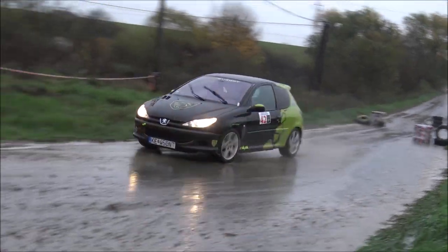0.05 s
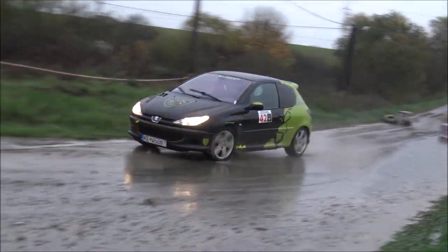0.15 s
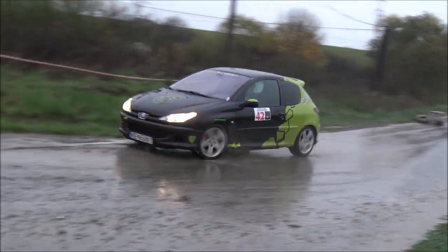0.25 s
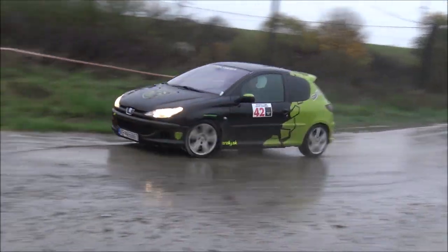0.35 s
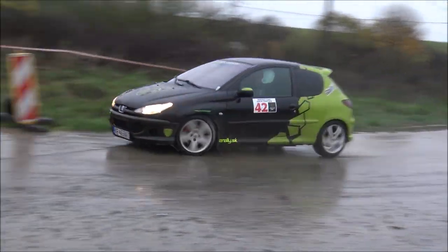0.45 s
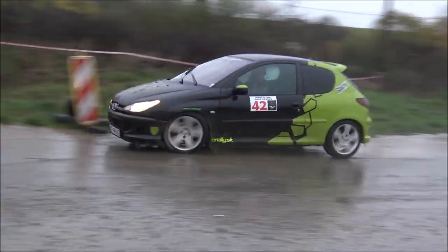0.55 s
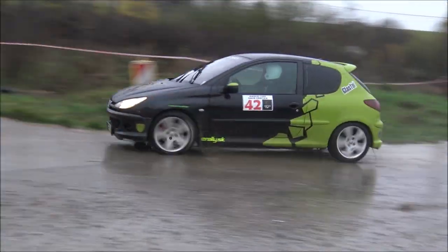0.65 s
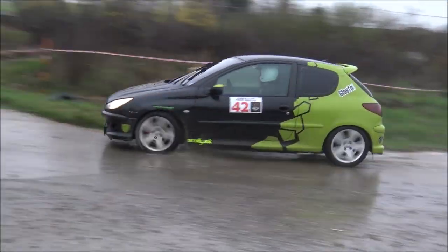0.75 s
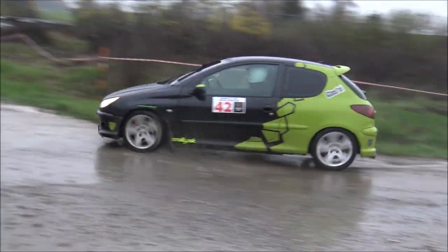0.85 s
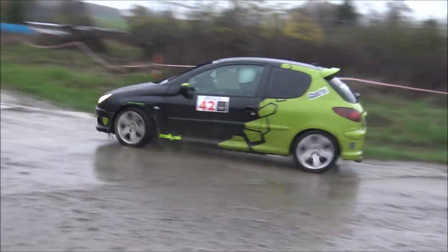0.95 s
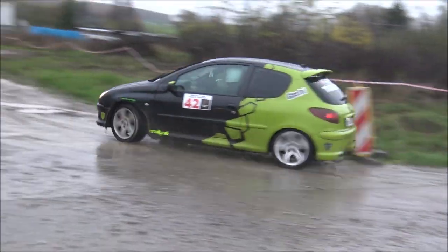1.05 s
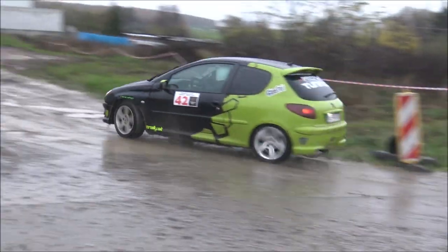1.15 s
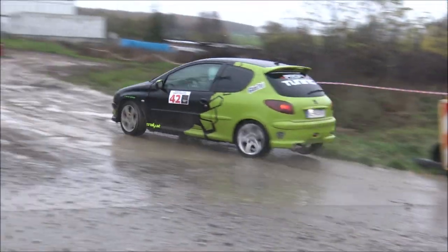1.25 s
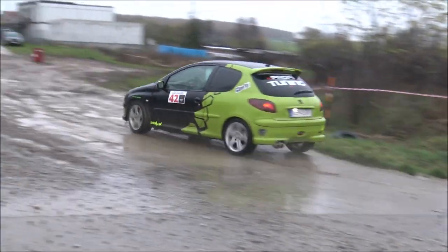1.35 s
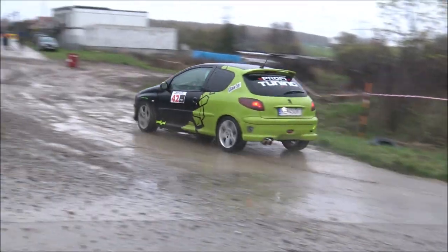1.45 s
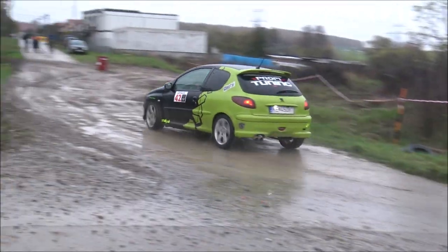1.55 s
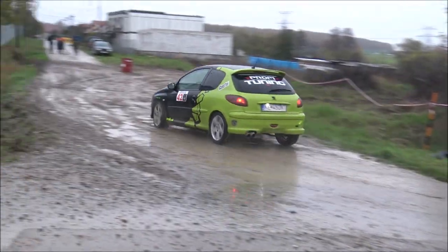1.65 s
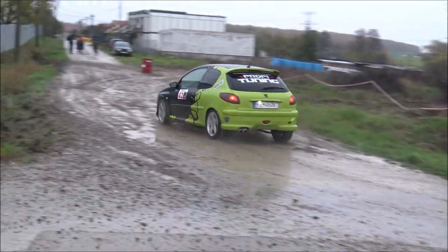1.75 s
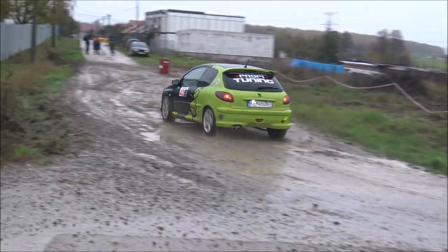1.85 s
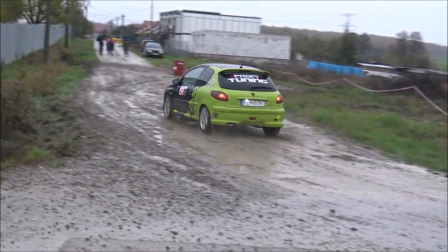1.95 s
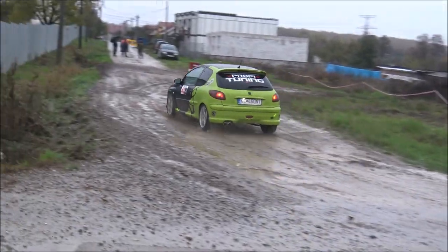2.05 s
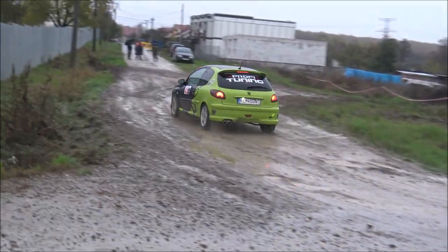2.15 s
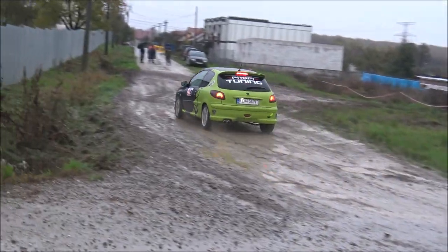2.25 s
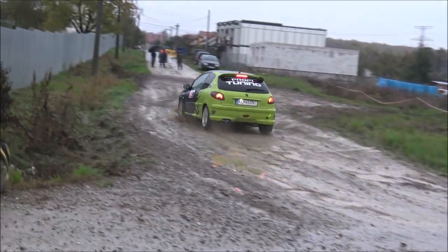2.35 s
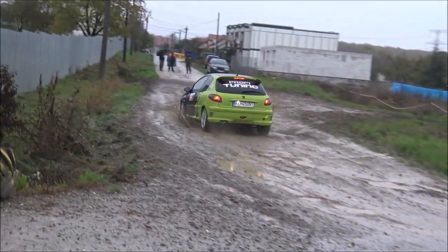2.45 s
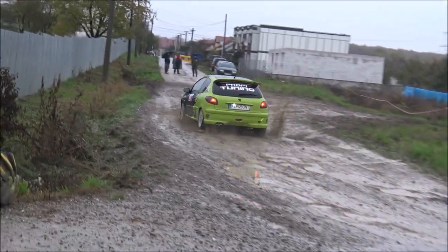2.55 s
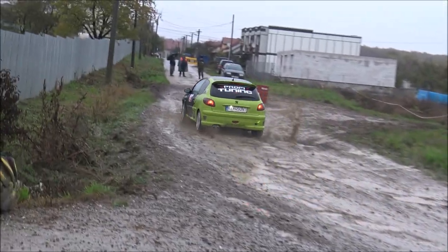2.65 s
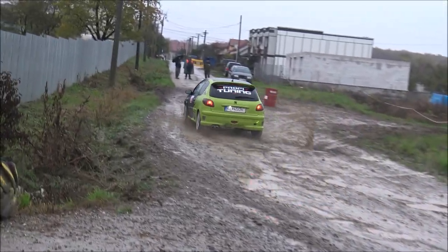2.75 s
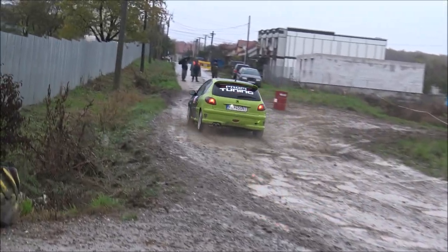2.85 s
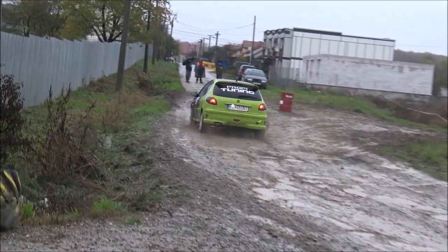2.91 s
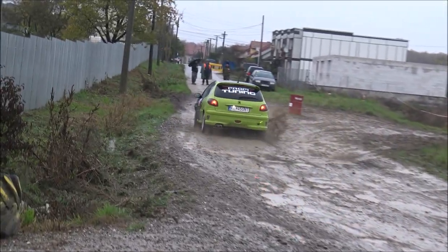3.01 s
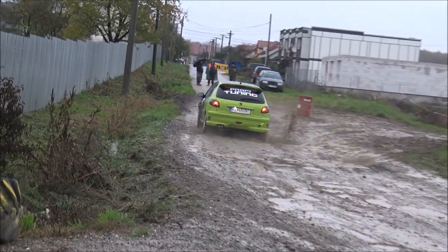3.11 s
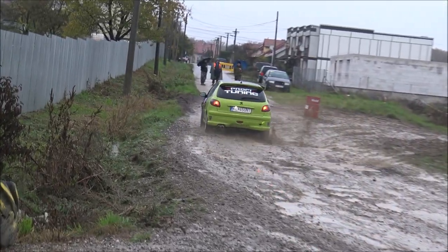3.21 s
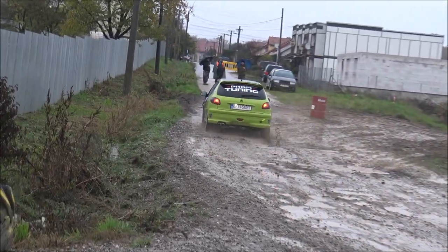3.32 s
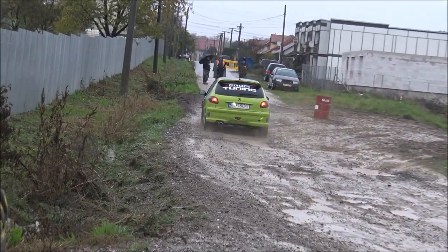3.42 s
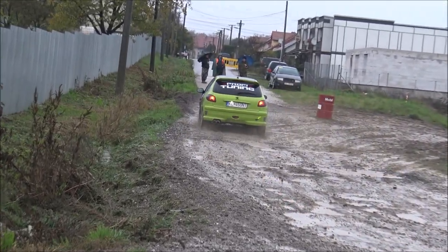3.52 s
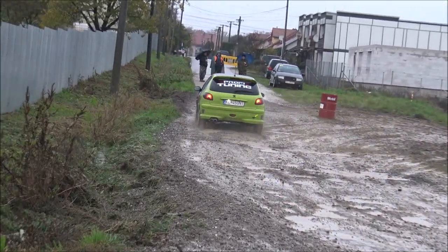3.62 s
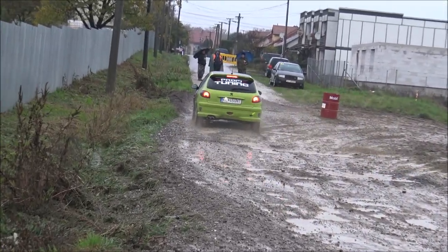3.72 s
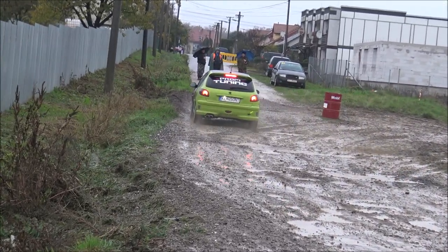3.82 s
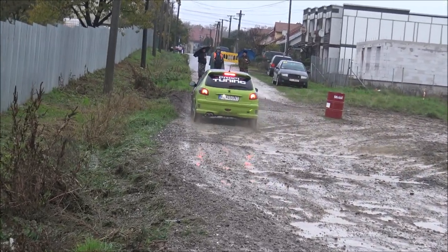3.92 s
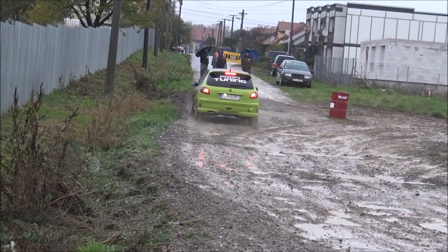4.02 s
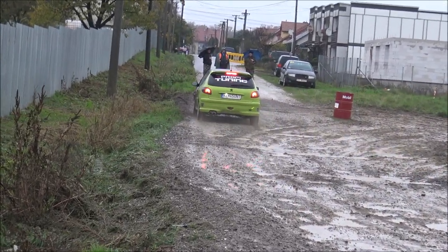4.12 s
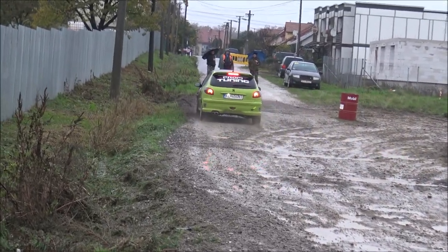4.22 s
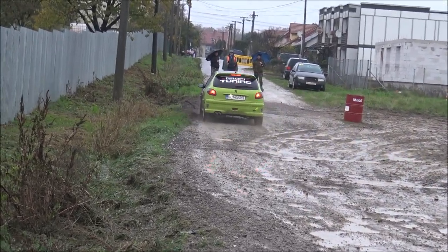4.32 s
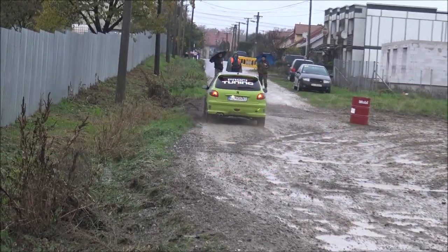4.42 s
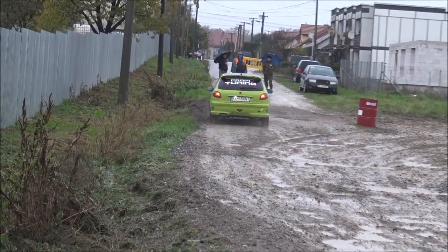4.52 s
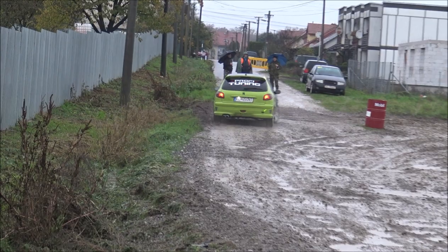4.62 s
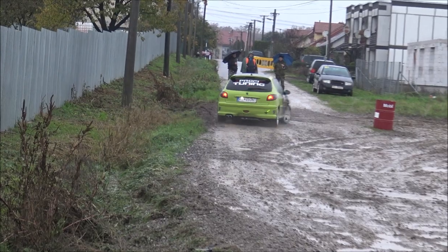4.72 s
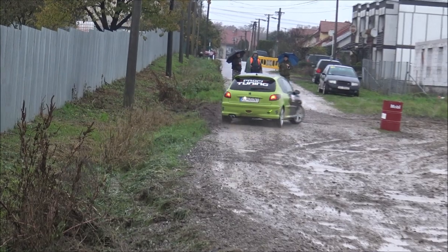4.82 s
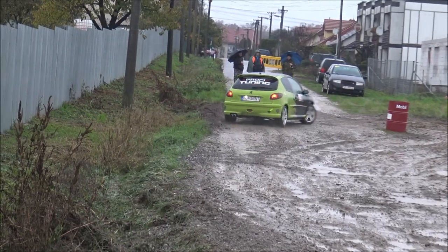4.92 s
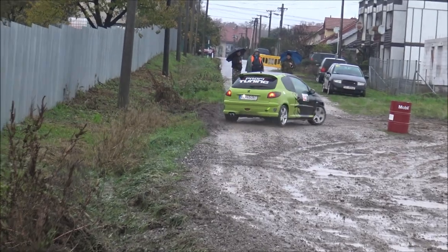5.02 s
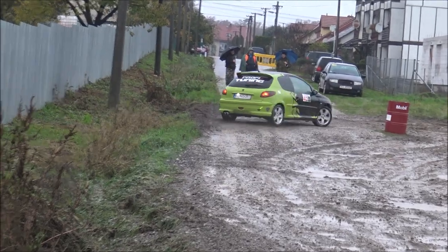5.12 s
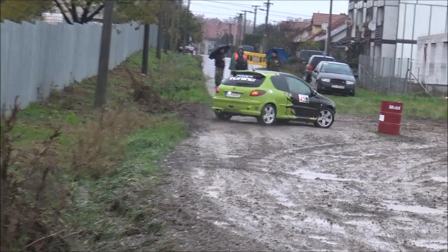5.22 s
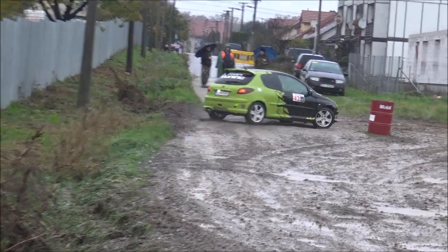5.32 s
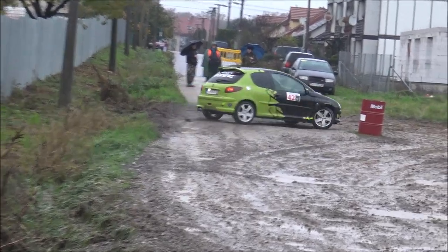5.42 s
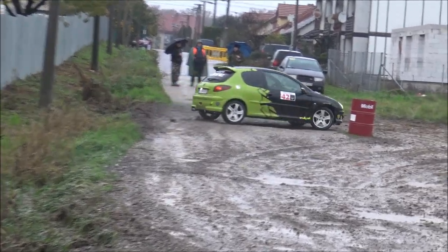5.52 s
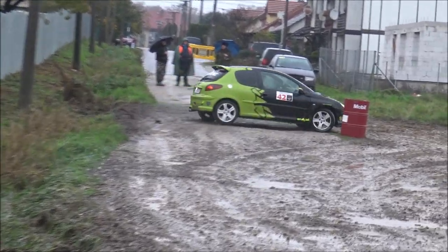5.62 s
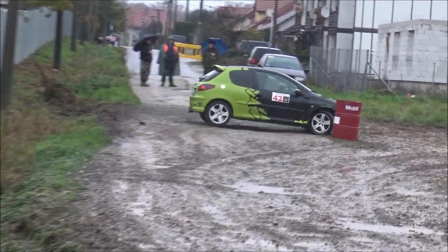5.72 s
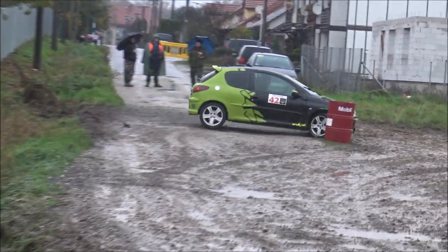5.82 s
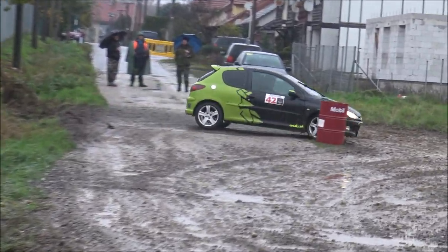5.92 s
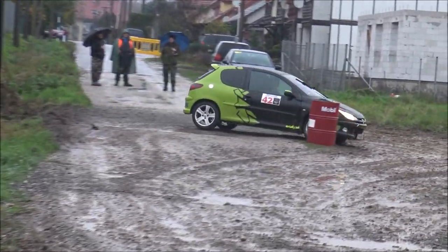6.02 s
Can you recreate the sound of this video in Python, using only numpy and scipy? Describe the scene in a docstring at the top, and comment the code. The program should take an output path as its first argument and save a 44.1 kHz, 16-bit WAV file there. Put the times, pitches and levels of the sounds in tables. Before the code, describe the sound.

On a wet, muddy outdoor course, a rally car's engine drones and howls past the trackside microphone over hissing spray. The exhaust loses its rasp with distance, eases briefly and surges again. Then the engine drops to a low, uneven burble and the tyres take over, scraping and crunching through a long gravel skid with a few stone knocks and a rumble over ruts. The sound stays near the centre.

```python
"""A small four-cylinder rally car passes about 4 m from the microphone at high revs on a wet, muddy course.
Its firings boom and rasp in the exhaust while the tyres throw spray. The driver lifts and brakes, the revs
sink, and the car slides round a turn some 18 m off, scrubbing through gravel and flinging stones.
It stays near the centre of the stereo image; fence and buildings return a faint echo of the exhaust."""
import sys
import numpy as np
from scipy import signal
from scipy.fft import rfft, irfft
from scipy.io import wavfile
from scipy.ndimage import uniform_filter1d, map_coordinates

SR = 44100
rng = np.random.default_rng(int(sys.argv[2]) if len(sys.argv) > 2 else 0)


def transcribe(u):
    """Save the signal u as a 16-bit wav file named by the first command-line argument.

    u: samples, shape (n,) or (channels, n), limited to [-1, 1]; the rate is SR.
    q: integer samples, one column per channel.
    """
    v = np.clip(np.atleast_2d(u).T, -1, 1)
    q = np.round(v * 32767).astype(np.int16)
    wavfile.write(sys.argv[1], SR, q)


N = 267238
TIME_S = np.arange(N) / SR


def undb(db):
    """Decibels to gain."""
    return 10 ** (np.asarray(db) / 20)


def curves(table):
    """Each column after the time column as a value per sample."""
    times, *columns = np.transpose(table)
    return [np.interp(TIME_S, times, column) for column in columns]


def colour(x, points):
    """Filter by a spectrum of (freq_hz, level_db) points, falling 20 dB an octave beyond its ends."""
    hz, db = np.transpose(points)
    bins_hz = np.maximum(np.arange(N + 1) * SR / (2 * N), 1)
    octaves_outside = np.abs(np.log2(bins_hz / np.clip(bins_hz, hz[0], hz[-1])))
    gain_db = np.interp(np.log(bins_hz), np.log(hz), db) - 20 * octaves_outside
    return irfft(rfft(x, 2 * N) * undb(gain_db))[:N]


def butter(x, hz, kind):
    """Fourth-order Butterworth filter."""
    return signal.sosfilt(signal.butter(4, hz, kind, fs=SR, output="sos"), x)


def unit(x, band_hz=None):
    """Scale to rms 1, overall or within a band."""
    return x / np.std(x if band_hz is None else butter(x, band_hz, "bandpass"))


def ring(x, modes):
    """Parallel resonances of (pitch_hz, width_hz, level_db), alternating in polarity."""
    return sum((-1) ** k * undb(db) * signal.lfilter(*signal.iirpeak(hz, hz / width, fs=SR), x)
               for k, (hz, width, db) in enumerate(modes))


def walk(rate_hz):
    """Smooth random wander with a spread near 1."""
    return map_coordinates(rng.standard_normal(4096), [TIME_S * rate_hz], order=2, mode="wrap")


def swell(start_s, length_s, attack_s, release_s, sag_db_per_s=0):
    """Gain that rises, holds or sags, and dies away."""
    age = np.maximum(TIME_S - start_s, 0)
    release = np.exp(-np.maximum(age - length_s, 0) / release_s)
    return np.minimum(age / attack_s, 1) * release * undb(-sag_db_per_s * age)


def blend(tones, gains):
    """Weighted sum of engine orders whose power holds steady as the weights shift."""
    return sum(gains[k] * tones[k] for k in tones) / np.sqrt(sum(g ** 2 for g in gains.values()))


# rolling rumble spectrum: freq_hz, density_db
RUMBLE_SPECTRUM = [(20, -23), (50, -19), (85, -4.5), (130, -3.5), (250, -1.5), (420, -5), (780, -5.5),
                   (1200, -15)]
# rumble along the rutted course: time_s, level_db
RUTS = [(0, -33), (2, -32), (3.2, -37.5), (5.1, -36), (5.6, -26), (6.06, -27)]


def rumble():
    """The wheels rumble over ruts."""
    rut_db, = curves(RUTS)
    return unit(colour(rng.standard_normal(N), RUMBLE_SPECTRUM)) * undb(rut_db + 2 * walk(3.882))


# brief hollow tones, mostly in the turn: centre_s, pitch_hz, width_hz, half_length_s, level_db
FLARES = [(0.643, 402, 17, 0.069, -22), (4.314, 180.6, 12, 0.055, -25.5), (4.672, 165, 10, 0.061, -26.5),
          (4.946, 276.5, 10.3, 0.049, -24.5), (5.032, 172.3, 5.55, 0.14, -22.5),
          (5.373, 282, 7.9, 0.058, -24), (5.984, 209.4, 13, 0.031, -20), (6.006, 507, 110, 0.086, -26.5),
          (5.965, 950, 69, 0.069, -24)]


def flares():
    """Narrow, wavering tones that swell and die away quickly."""
    out = np.zeros(N)
    for centre, hz, width, half_length, db in FLARES:
        phase = 2 * np.pi * np.cumsum(hz + width / 2 * walk(2 * width)) / SR
        out += np.sqrt(2) * np.sin(phase) * undb(db) * np.exp(-((TIME_S - centre) / half_length) ** 2)
    return out


def strikes(table, modes, crumble_s, crumble):
    """Each blow is a sharp contact and a brief crumble that ring the given modes."""
    t = np.arange(2048) / SR
    out = np.zeros(N + len(t))
    for start, db in table:
        push = crumble * rng.standard_normal(len(t)) * np.exp(-t / crumble_s) - (t == 0)
        hit = ring(push, modes)
        out[int(start * SR):][:len(t)] += undb(db) * hit / np.abs(hit).max()
    return out[:N]


# stones hitting the underbody in the turn: start_s, relative_peak_db
KNOCKS = [(4.1193, -19), (4.3642, -14), (4.3879, -15), (4.6, -14.5), (4.6763, -8.5), (4.8351, -14)]
# underbody modes: pitch_hz, width_hz, level_db
PANEL_MODES = [(950, 83, -1), (1382.4, 172, 3), (1750, 290, -4.5), (2099, 170, -3)]
# flung pebbles landing on the course: start_s, relative_peak_db
PEBBLES = [(4.239, -28), (4.4226, -26), (4.7156, -20), (4.7902, -13), (5.4255, -23), (5.7486, -15),
           (5.9, -21), (5.9878, -23), (6.0201, -29)]


def stones():
    """Large stones knock on the floor pan; pebbles click as they land."""
    knocks = strikes(KNOCKS, PANEL_MODES, crumble_s=0.0048, crumble=0.082)
    pebbles = strikes(PEBBLES, [(6600, 1700, 8), (11000, 2800, -10)], crumble_s=0.0018, crumble=0.79)
    return undb(0.5) * knocks + undb(-2.5) * pebbles


# standing water near the microphone: start_s, length_s, splash_db, scrub_db
PUDDLES = [(-.05, 0.14, -39, -34.5), (-.05, .25, -36, -41), (.2, 0.374, -38, -40.5),
           (0.556, 0.32, -37, -37.5), (0.933, 0.53, -45.5, -44.5), (1.422, .27, -40, -39.5)]
# the tyres lose grip in the turn: start_s, length_s, scrub_db, grit_db
SKIDS = [(4.309, .08, -21, -50), (4.66, 1.167, -21.5, -29.2), (5.855, 0.1655, -25.5, -32)]


def tyre_contact():
    """Gains of scrub, grit and spray; rolling, puddles and slides add in power."""
    # wet tarmac gives way to ever coarser gravel
    on_gravel_s = np.clip(TIME_S - 1.85, 0, 2.4)
    scrub = undb(-43 + 4 * on_gravel_s)
    grit = undb(-41 + 1.47 * on_gravel_s)
    spray = undb(-47)
    for start, length, splash_db, scrub_db in PUDDLES:
        splash = swell(start, length, attack_s=0.043, release_s=0.029)
        scrub = np.hypot(scrub, splash * undb(scrub_db))
        grit = np.hypot(grit, splash * undb(splash_db))
        spray = np.hypot(spray, splash * undb(splash_db - 1))
    for start, length, scrub_db, grit_db in SKIDS:
        slide = swell(start, length, attack_s=.16, release_s=0.043, sag_db_per_s=1.3)
        drying_db = 5 * (TIME_S - start)  # a slide throws water at first and soon wipes the ground dry
        scrub = np.hypot(scrub, slide * undb(scrub_db))
        grit = np.hypot(grit, slide * undb(grit_db))
        spray = np.hypot(spray, slide * undb(grit_db - 8.5 - drying_db))
    return scrub, grit, spray


def grains(per_s, spread_db, smooth):
    """Countless tiny impacts of uneven size over a share of smooth rush."""
    size = undb(spread_db * np.minimum(rng.exponential(size=N), 5)) * rng.standard_normal(N)
    return unit(size * (rng.random(N) < per_s / SR)) + smooth * rng.standard_normal(N)


# spectra of scrubbing tread, crunching grit and thrown water: freq_hz, density_db
SCRUB_SPECTRUM = [(60, -16), (120, -6), (200, 1.5), (400, -12), (520, -10), (740, -2.5), (1080, -8),
                  (1300, -2.5), (1560, -3.5), (1850, -7.5), (2120, -6.5), (2600, -16.5), (4000, -31)]
GRIT_SPECTRUM = [(1800, -5.5), (2700, -0.5), (3200, -2.5), (4300, -6), (5500, -10.5), (6500, -11.5),
                 (9000, -28.5)]
SPRAY_SPECTRUM = [(4000, -5.5), (5800, -7.5), (6600, -5.5), (8500, -7), (10500, -12), (13000, -19),
                  (16000, -25)]


def tyres():
    """Tread scrubs through gravel, crunches grit and throws water; all three judder and surge together."""
    scrub_gain, grit_gain, spray_gain = tyre_contact()
    judder_db = .9 * walk(55) + .55 * (walk(20.86) + walk(9.4))
    scrub = unit(colour(grains(3000, spread_db=2.5, smooth=1.0), SCRUB_SPECTRUM), band_hz=(1200, 2600))
    grit = unit(colour(grains(5000, spread_db=3.0, smooth=0.78), GRIT_SPECTRUM))
    spray = unit(colour(grains(3000, spread_db=4, smooth=1.5), SPRAY_SPECTRUM))
    direct = undb(judder_db) * (scrub * scrub_gain + grit * grit_gain + spray * spray_gain)
    # wheel arches and wet ground reflect it along paths that shift as the car moves
    delays_s = [delay * (1 + .15 * walk(1.5)) for delay in (.0019, .0046)]
    return direct + sum(.2 * np.interp(TIME_S - delay, TIME_S, direct) for delay in delays_s)


def firings(turns, imbalance_db, scatter_db, jitter_s):
    """Two exhaust pulses a turn; every second one is weaker, and no two are quite alike."""
    count = np.arange(1, int(2 * turns[-1]))
    size_error, time_error = rng.standard_normal((1200, 2))[:len(count)].T
    size = undb(scatter_db * size_error - count % 2 * imbalance_db)
    position = np.interp(count / 2, turns, np.arange(N)) + SR * jitter_s * time_error
    fraction, whole = np.modf(np.clip(position, 0, N - 2))
    sample = whole.astype(int)
    return np.bincount(sample, size * (1 - fraction), N) + np.bincount(sample + 1, size * fraction, N)


# silencer modes: pitch_hz, width_hz, level_db
SILENCER_MODES = [(158.3, 16.6, 8.5), (202, 37.8, -1), (258.7, 20, -5), (359, 31, 1)]


def burble(turns, crank_hz):
    """Ragged firings off the throttle ring the silencer, louder with the revs."""
    pulses = firings(turns, imbalance_db=15.0, scatter_db=2.5, jitter_s=0.00022)
    ringing = butter(ring(pulses, SILENCER_MODES), 150, "high")
    running_rms = np.sqrt(uniform_filter1d(ringing ** 2, size=4000) + 1e-18)
    return ringing / running_rms * undb(-31 + 0.4757 * (crank_hz - 55.18))


def gas(turns, effort_db, revs_hz, ragged):
    """Turbulent gas leaves with each firing, louder with effort and when the engine labours at low revs."""
    rush = unit(colour(rng.standard_normal(N), [(200, -1.0), (400, 2.5), (750, -3.5), (1400, -31)]))
    puffs = 1 + .5 * np.cos(4 * np.pi * turns)
    return rush * puffs * undb(-31 + 0.24 * effort_db - revs_hz - 12.5 * ragged)


# the throb swells under load: start_s, length_s, level_db
THROBS = [(.1, 0.68, -40.5), (1.659, 0.26, -42)]


def throb(tone, boom_db, ragged):
    """An unsteady throb, about once a turn, follows the boom and grows under load or when coasting."""
    loaded = sum(undb(db) * swell(start, length, attack_s=0.1, release_s=.12)
                 for start, length, db in THROBS)
    coasting = ragged * undb(-39)
    return tone * (undb(boom_db - 36) + loaded + coasting) * undb(4.3 * walk(22))


# spectrum of the exhaust's hard edge: freq_hz, level_db
RASP_SPECTRUM = [(600, -9), (700, -20), (790, 5.5), (880, -5.5), (1000, -5), (1100, -24), (1240, -8.5),
                 (1450, -41), (1800, -38)]
PASS_S, CLOSEST_M, SPEED_M_S, TURN_M = 1, 4.1, 16.4, 18.1


def rasp(tones, crank_hz, effort_db):
    """High orders rasp with effort and carry to the microphone only from close by."""
    # straight past the microphone, then round the turn at a steady distance
    distance_m = np.minimum(np.hypot(CLOSEST_M, SPEED_M_S * (TIME_S - PASS_S)), TURN_M)
    distance_db = 20 * np.log10(CLOSEST_M / distance_m)
    gains = {k: undb(np.interp(k * crank_hz, *np.transpose(RASP_SPECTRUM))) for k in tones}
    return blend(tones, gains) * undb(-6.5 + effort_db + 0.77 * distance_db)


# the pipe's strongest resonance, shifting with the throttle: time_s, pitch_hz
HOWL = [(0.0, 623), (0.21, 560), (0.67, 553), (0.74, 637), (1.17, 545), (1.21, 603), (1.57, 556.6),
        (1.89, 620), (2.0, 549.3), (3.06, 480), (3.79, 602), (3.95, 513)]
GROWL_HZ, GROWL_HALF_WIDTH_HZ, GROWL_DB = 291, 8.9, -15


def pipe(tones, crank_hz, effort_db, revs_hz, ragged):
    """Orders howl in a pipe resonance that broadens with effort, and growl in a narrow silencer one."""
    howl_hz, = curves(HOWL)
    half_width_hz = 69 * undb(0.53 * effort_db)
    floor = 0.2 * undb(.5 * effort_db)
    # odd orders arise as the cylinder pairs fire unequally, more so at high revs and under load
    odd_db = -1 + 1.2 * revs_hz + 0.16 * effort_db
    gains = {}
    for k in tones:
        hz = k * crank_hz
        howl = floor + 1 / (1 + ((hz - howl_hz) / half_width_hz) ** 2)
        passband = (k != 4) / np.hypot(1, (hz / 730) ** 14)  # order 4 is left to the drone
        growl = undb(GROWL_DB) / (1 + ((hz - GROWL_HZ) / GROWL_HALF_WIDTH_HZ) ** 2)
        gains[k] = undb(k % 2 * odd_db) * (howl * passband + growl * (1 - ragged))
    return blend(tones, gains)


# engine speed through the pass and the turn: time_s, crank_hz
CRANK = [(0.0, 95.4), (0.56, 88.16), (0.61, 82.5), (0.93, 83.84), (1.03, 89.8), (1.21, 85.86), (1.69, 88),
         (2.01, 97.44), (2.13, 91.5), (2.26, 93.8), (2.5, 89.6), (2.95, 92.2), (3.05, 84.86), (3.53, 88.55),
         (3.81, 88.7), (4.2, 71.57), (4.6, 42.08), (4.93, 55.98), (6.06, 49.3)]
# exhaust levels before cuts, raggedness and fade: time_s, boom_db, drone_db, pipe_db
EXHAUST_LEVELS = [(0.0, -11.5, -47, -25.5), (0.14, -10, -25.5, -31.5), (0.33, -11.5, -25, -24),
                  (0.55, -16.5, -28.5, -23.5), (0.64, -19, -25.0, -22), (0.95, -17.5, -24.5, -22),
                  (1.3, -19.0, -25, -21), (1.48, -11.5, -21.0, -22), (1.76, -12, -24, -24),
                  (1.98, -16.5, -36, -15.5), (2.1, -11.5, -27.5, -22.0), (2.3, -14, -20.5, -23.0),
                  (2.42, -22, -32, -32.5), (2.65, -19, -31.5, -33.5), (2.96, -22, -21.5, -28),
                  (3.06, -22, -33.5, -28.5), (3.38, -21.5, -38, -28), (3.5, -16.0, -24.5, -22.5),
                  (3.85, -16.5, -23, -22), (3.93, -16, -30.5, -36), (4.08, -45, -35, -31.5),
                  (4.6, -38, -39, -40)]
# the engine cuts out for an instant: centre_s, half_length_s, depth_db
CUTS = [(0.588, 0.016, 8), (2.667, .015, 7.5), (3.9, 0.0096, 4), (4.034, 0.0097, 5), (4.17, .03, 3)]
CRUISE_HZ, CRUISE_DB = 88, -22
FADE_S, FADE_DB_PER_S = 4.52, 74  # all but the burble dies away in the turn


def engine():
    """Firings boom twice a turn and drone an octave above; returns the exhaust's lows and overtones."""
    crank_hz, = curves(CRANK)
    boom_db, drone_db, pipe_db = curves(EXHAUST_LEVELS)
    effort_db = pipe_db - CRUISE_DB
    revs_hz = np.maximum(crank_hz - CRUISE_HZ, -6)
    ragged = np.clip((84 - crank_hz) / 14, 0, 1)  # combustion grows ragged as the revs sink
    cut_db = sum(db * np.exp(-((TIME_S - centre) / half_length) ** 2) for centre, half_length, db in CUTS)
    firing = undb(-cut_db - FADE_DB_PER_S * np.maximum(TIME_S - FADE_S, 0))
    turns = np.cumsum(crank_hz * (1 + 0.0043 * walk(24.81))) / SR
    force = np.interp(turns, np.arange(600), rng.standard_normal(600))  # some turns fire harder

    def order(k):
        """A tone at k times the crankshaft rate; higher ones leave the pipe later and flutter more."""
        flutter_db = .1 * k * force + (.08 * k + 1.5 * ragged) * walk(40) + .12 * k * walk(5)
        # unequal manifold branches make every second firing late, shifting the odd orders' phase
        lag = .2 * k ** 2 - 2 * k + .7 * (k % 2) + .025 * k * walk(30) + .06 * k * walk(3)
        return np.sqrt(2) * np.cos(2 * np.pi * k * turns - lag) * undb(flutter_db)

    tones = {k: order(k) for k in range(3, 20)}
    tailpipe = pipe(tones, crank_hz, effort_db, revs_hz, ragged) + rasp(tones, crank_hz, effort_db)
    drone = order(4) * undb(drone_db - 3 * ragged)
    overtones = drone + tailpipe * undb(pipe_db) + gas(turns, effort_db, revs_hz, ragged)
    burbling = burble(turns, crank_hz) * ragged
    throbbing = throb(order(0.99), boom_db, ragged)
    boom = order(2) * undb(boom_db + (8.5 * walk(24) - 4) * ragged)  # stumbles and weakens when ragged
    return (throbbing + boom) * firing + burbling, overtones * firing


def echo(x, decay_s):
    """Fence and buildings round the course return a diffuse stereo tail after 20 ms."""
    t = np.arange(SR // 2) / SR
    tail = rng.standard_normal((2, len(t))) * np.exp(-t / decay_s) * (t > .02)
    return signal.fftconvolve(x[None], tail / np.linalg.norm(tail[0]), axes=1)[:, :N]


def scene():
    """From the trackside: the boom nearly central, the tailpipe a little right, the ground noise wider."""
    lows, overtones = engine()
    ground = rumble() + tyres() + stones() + flares()
    sides = np.array([[1], [-1]])  # left, right
    exhaust = lows * undb(0.34 * sides) + overtones * undb(-1.25 * sides)
    # sound scattered from the sides widens the lows most
    scatter_spectrum = [(30, -3), (300, -24), (1200, -24.5), (8000, -42.5), (14000, -23)]
    scattered = colour(np.roll(ground, SR // 150), scatter_spectrum) * sides
    return exhaust + ground + scattered + undb(-17.5) * echo(overtones + .5 * lows, decay_s=0.072)


def record(dry):
    """The camcorder at the trackside cuts the treble above 15.75 kHz."""
    return signal.sosfilt(signal.ellip(10, .2, 80, 15750, fs=SR, output="sos"), dry)


dry = scene()
out = record(dry)
transcribe(out)
```